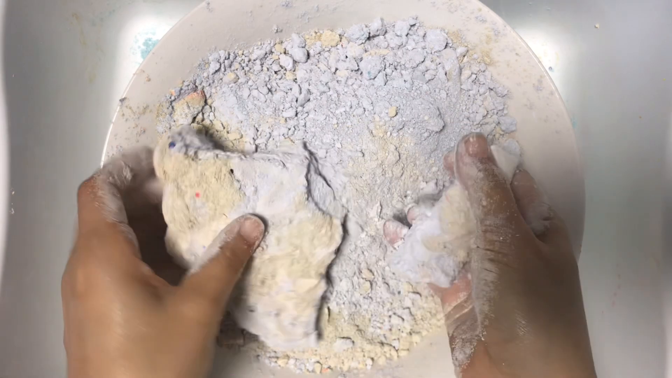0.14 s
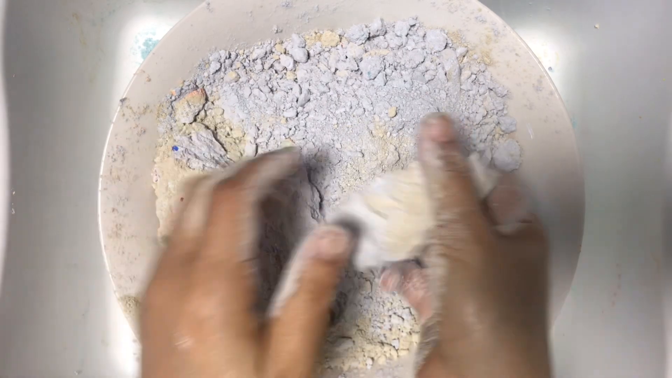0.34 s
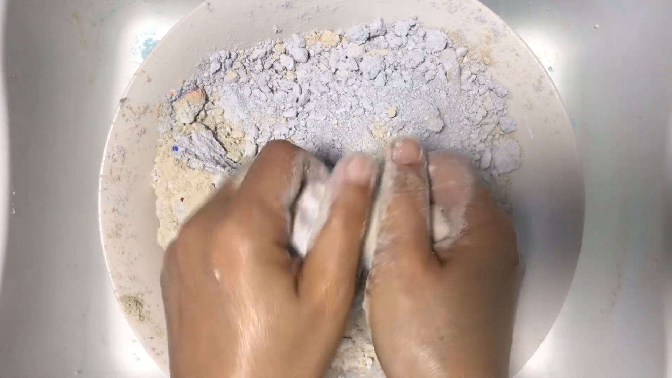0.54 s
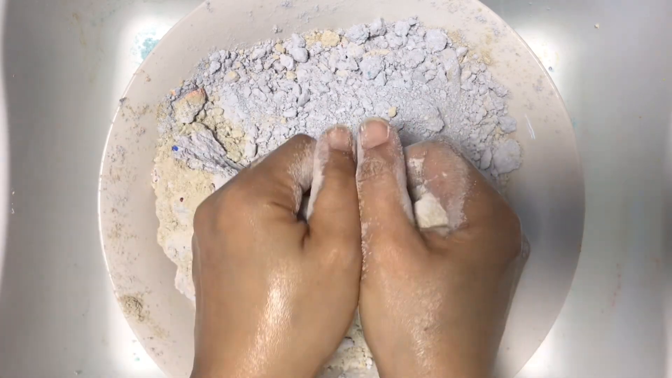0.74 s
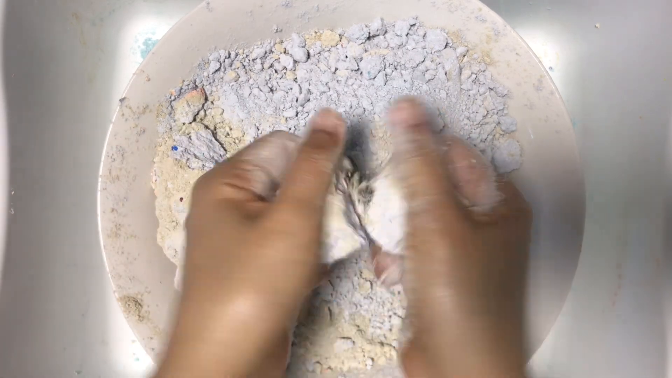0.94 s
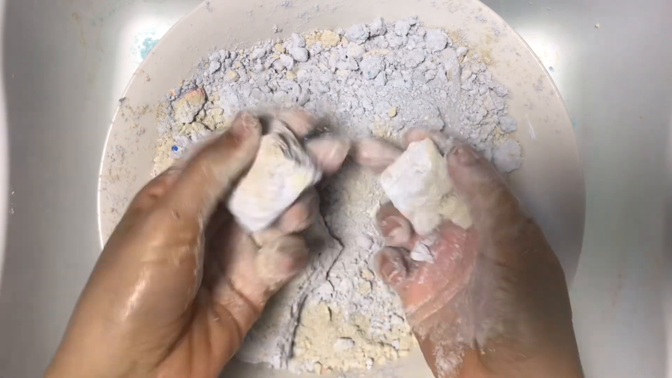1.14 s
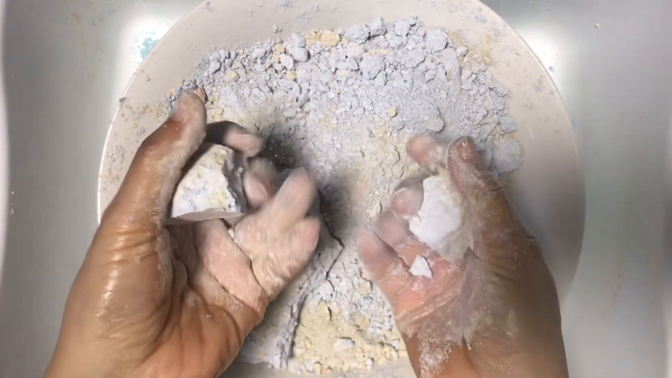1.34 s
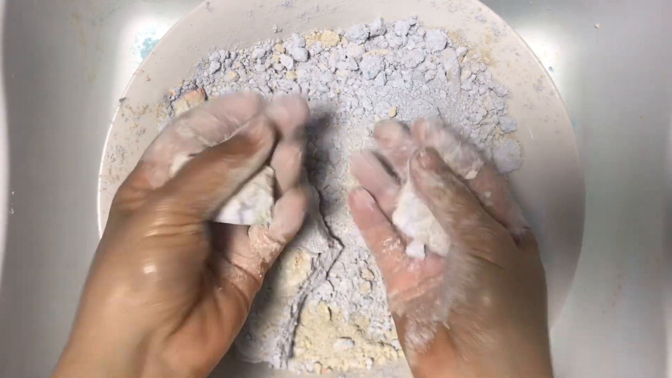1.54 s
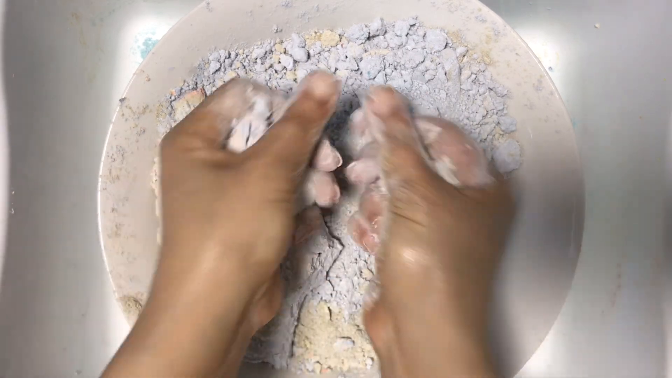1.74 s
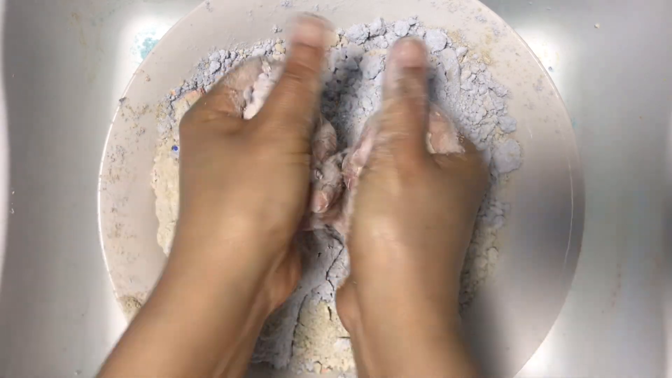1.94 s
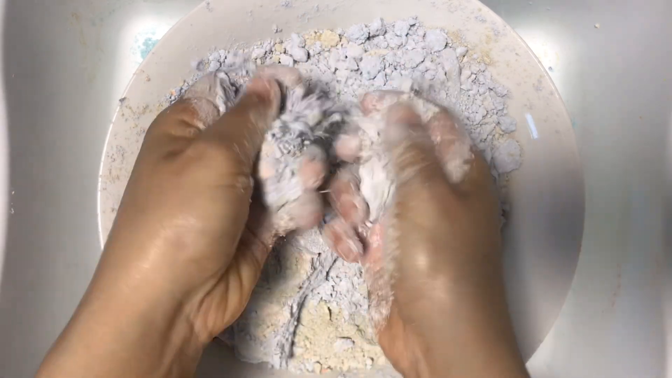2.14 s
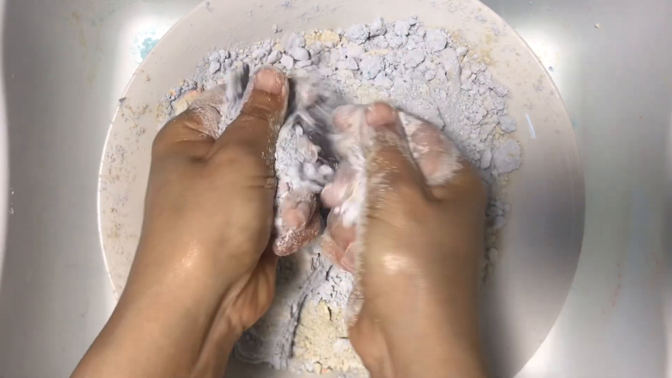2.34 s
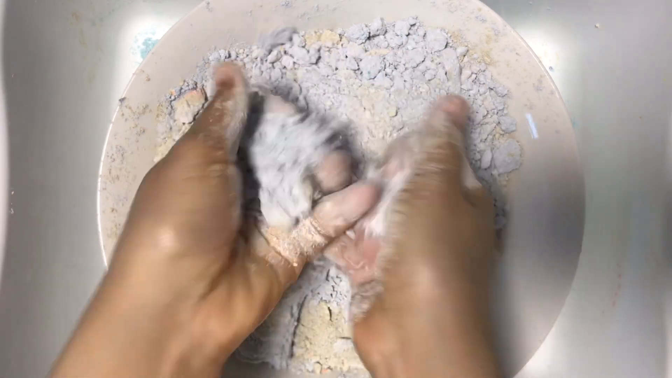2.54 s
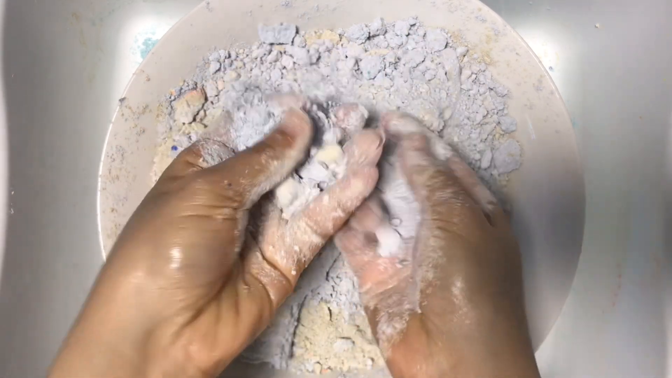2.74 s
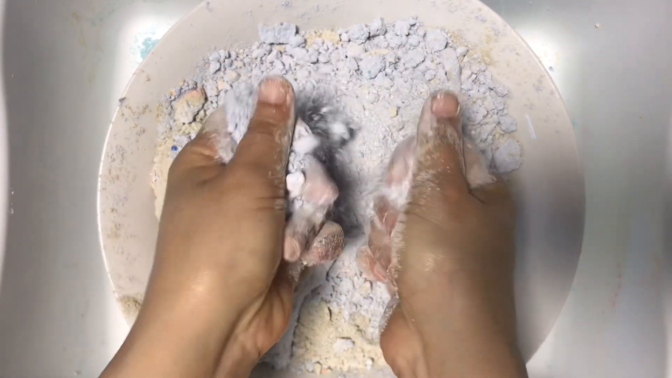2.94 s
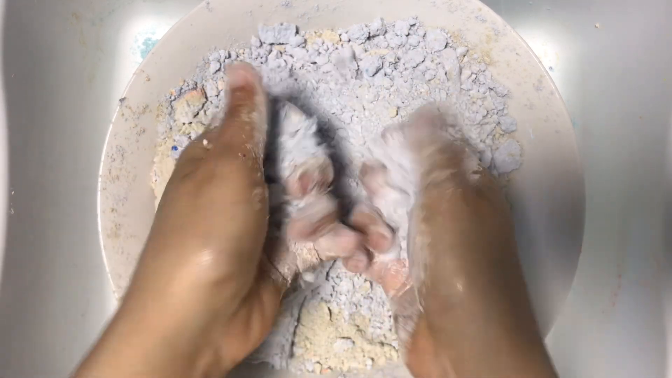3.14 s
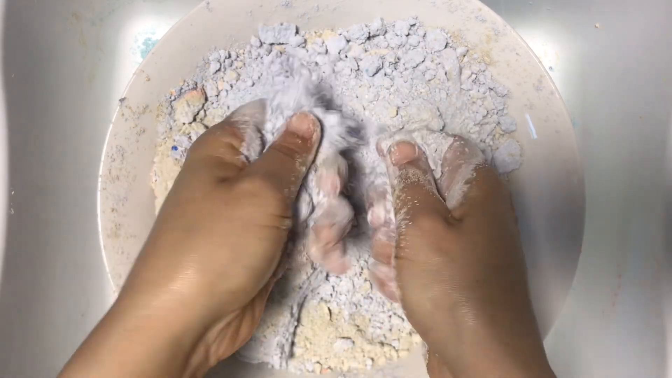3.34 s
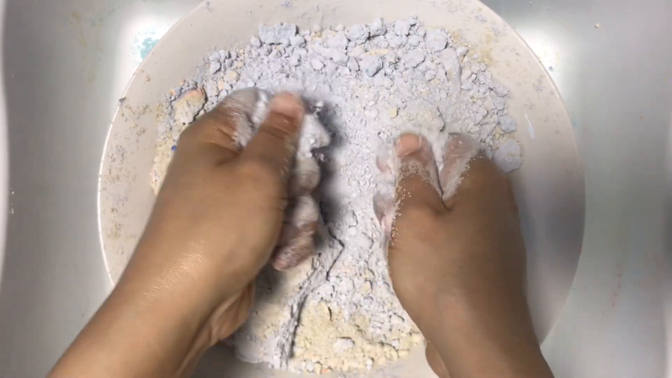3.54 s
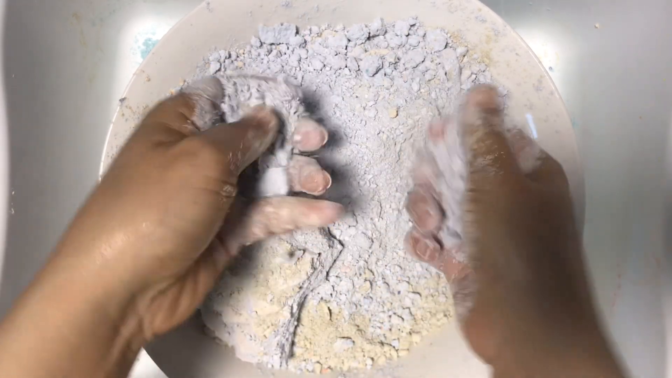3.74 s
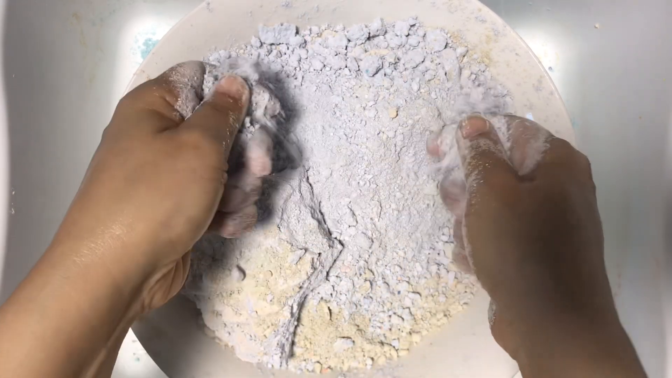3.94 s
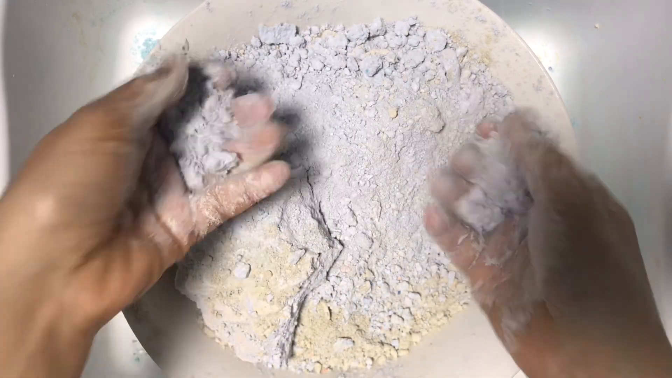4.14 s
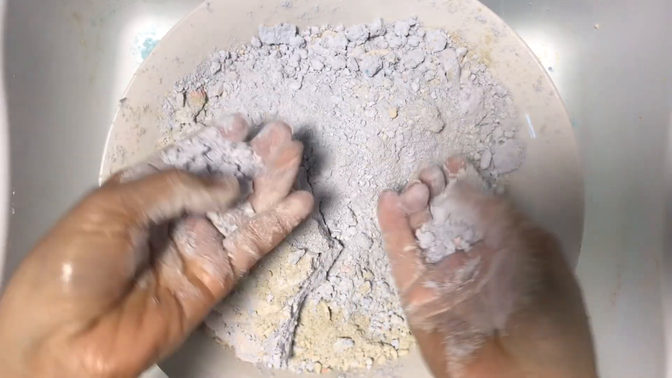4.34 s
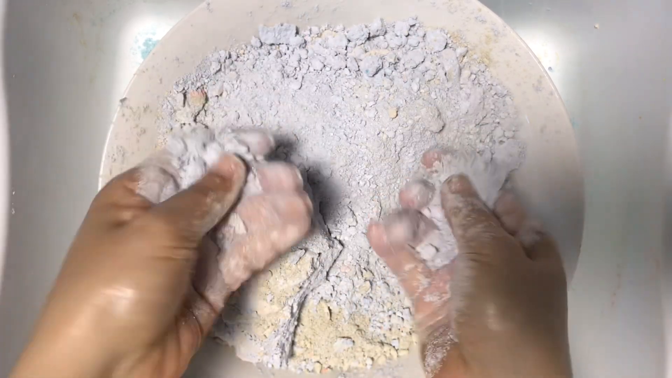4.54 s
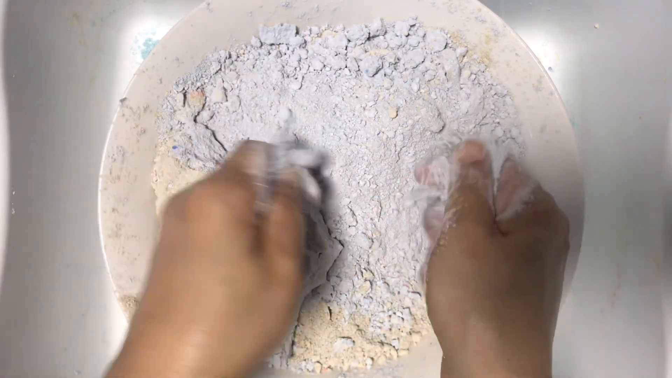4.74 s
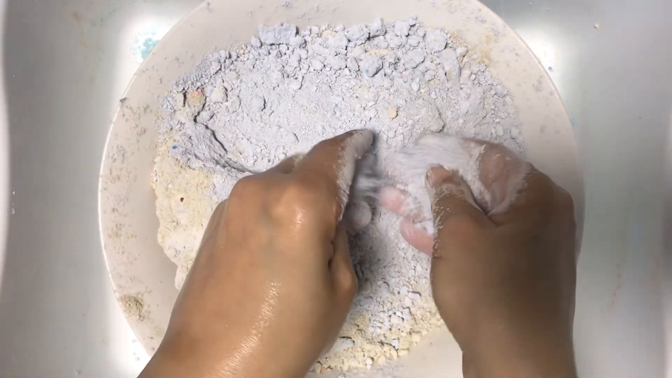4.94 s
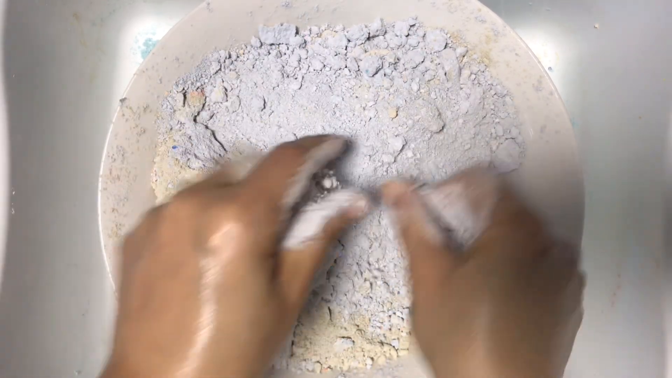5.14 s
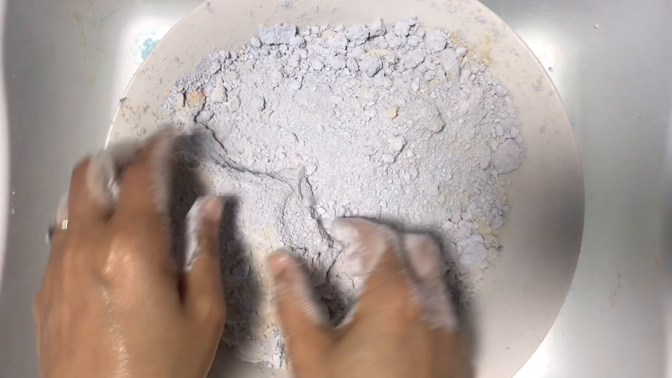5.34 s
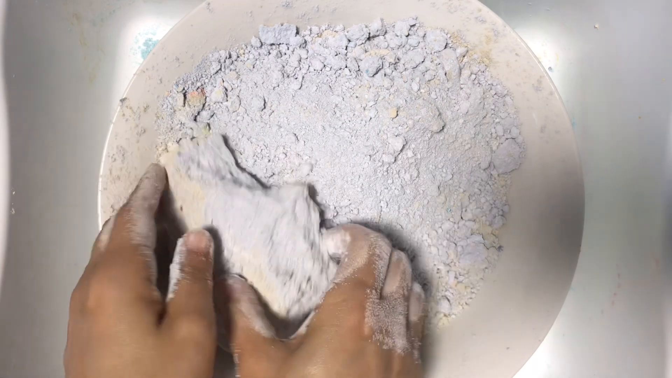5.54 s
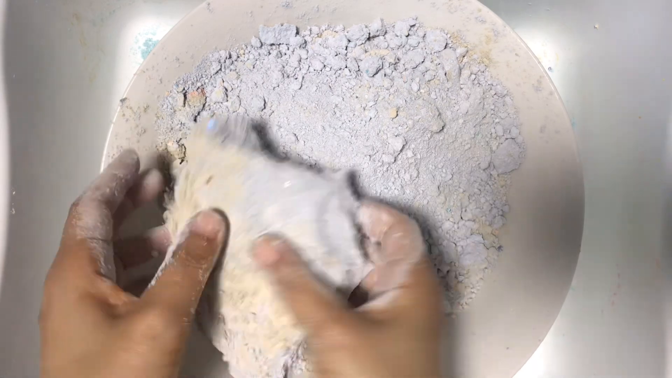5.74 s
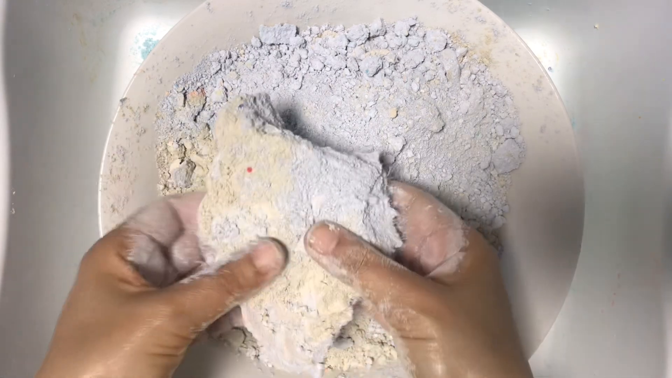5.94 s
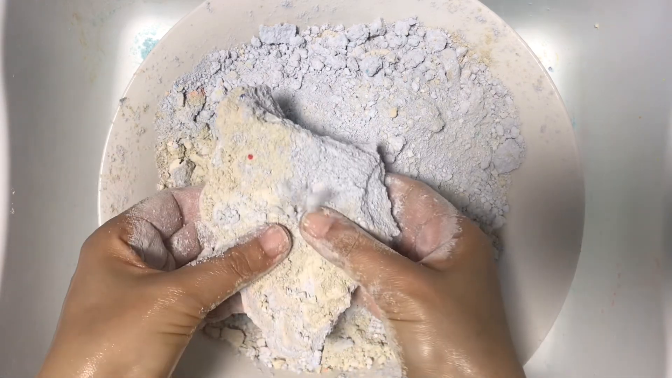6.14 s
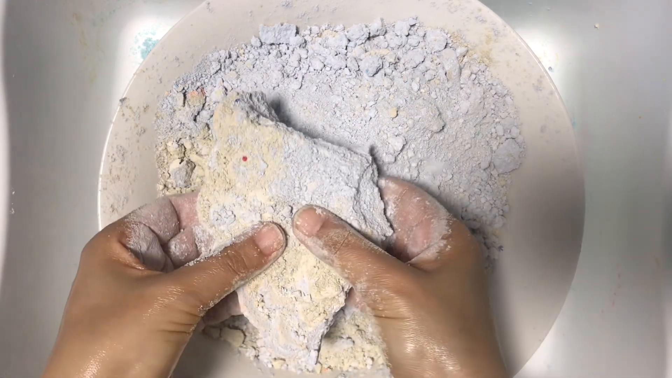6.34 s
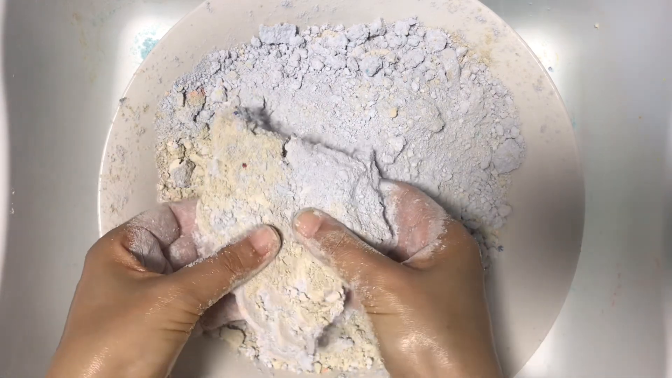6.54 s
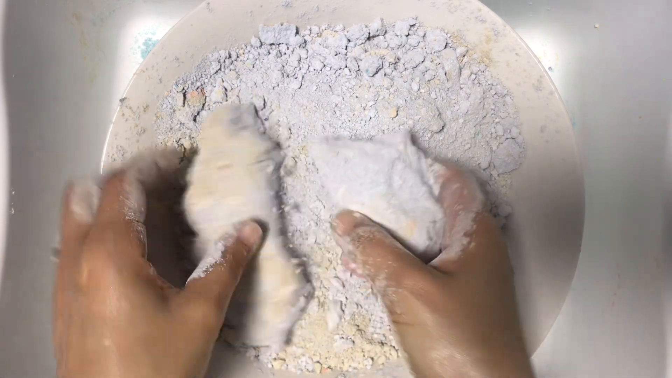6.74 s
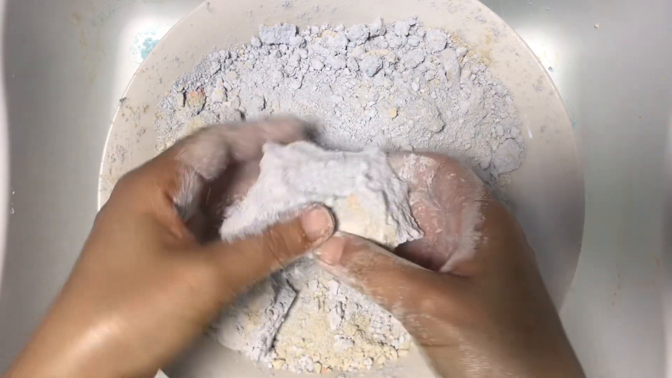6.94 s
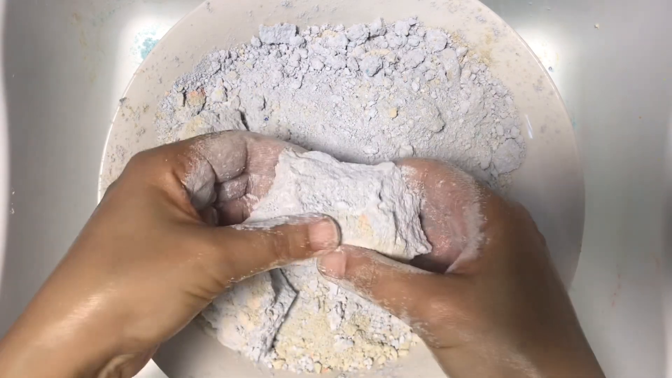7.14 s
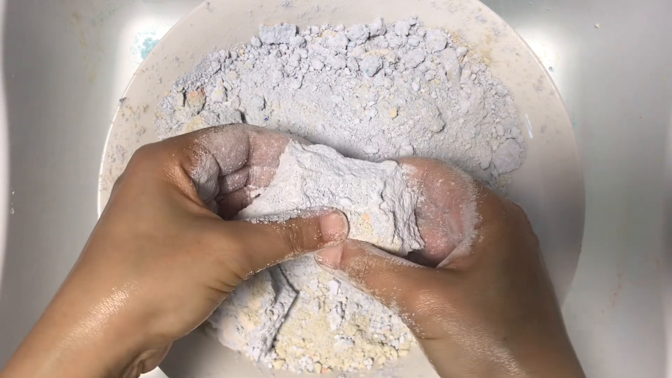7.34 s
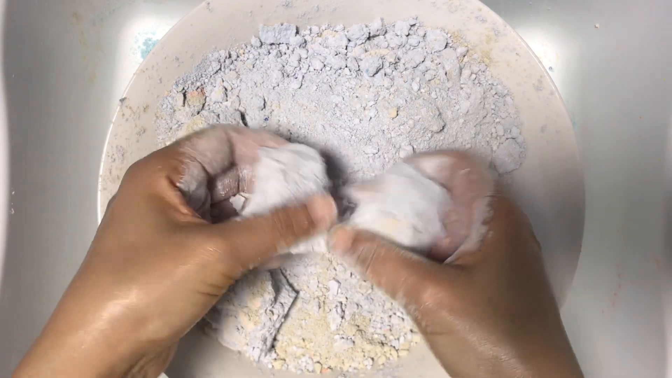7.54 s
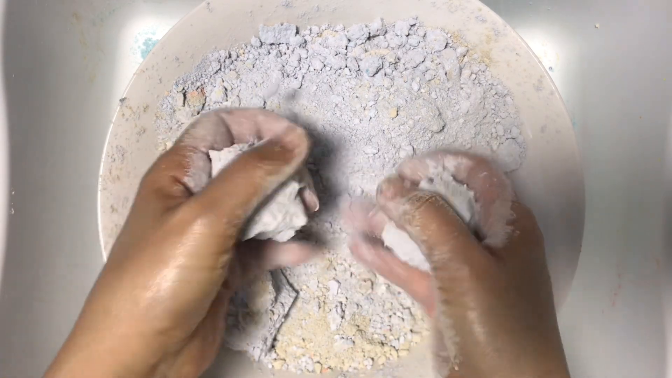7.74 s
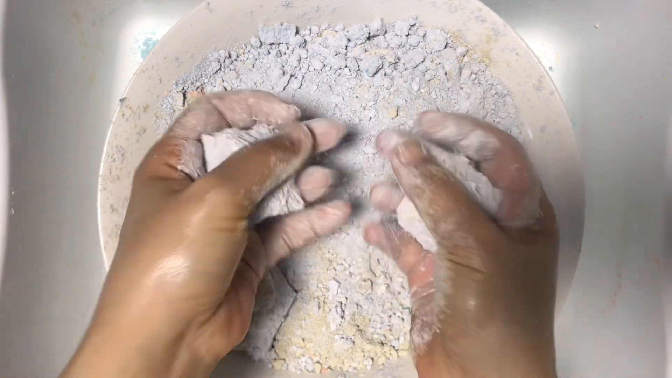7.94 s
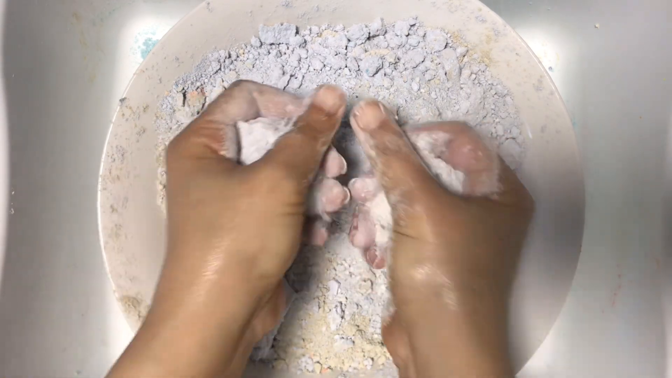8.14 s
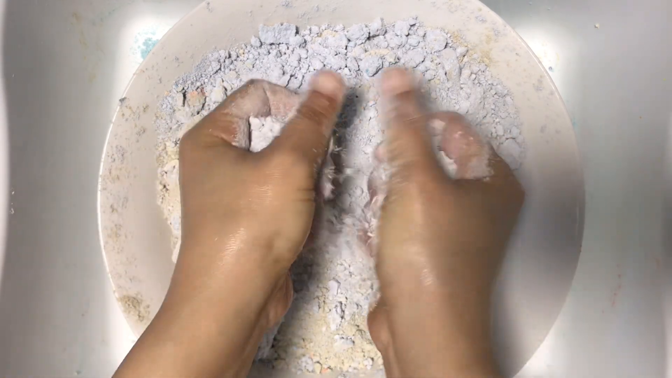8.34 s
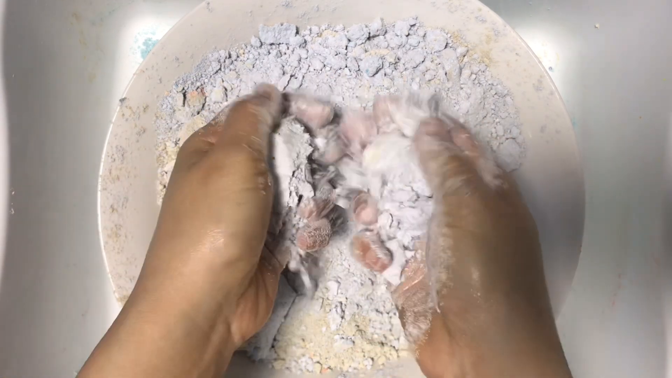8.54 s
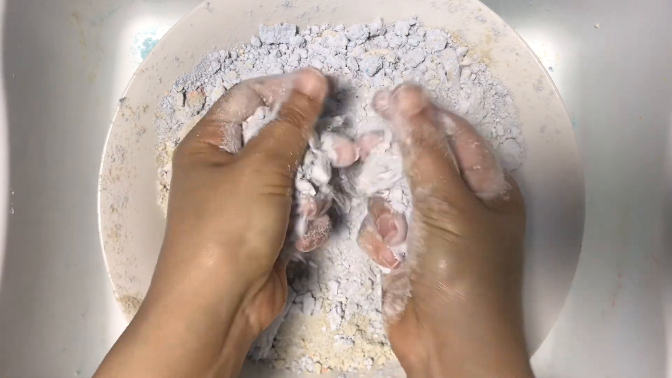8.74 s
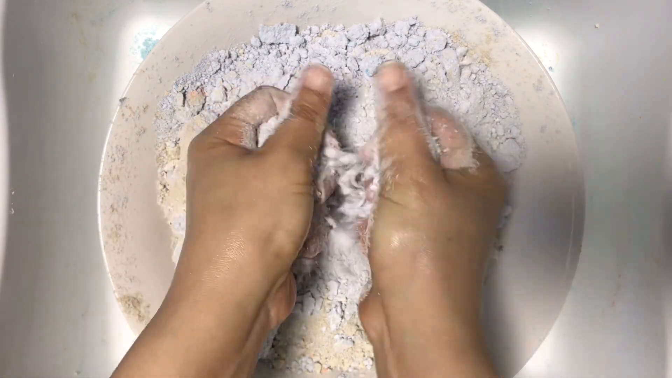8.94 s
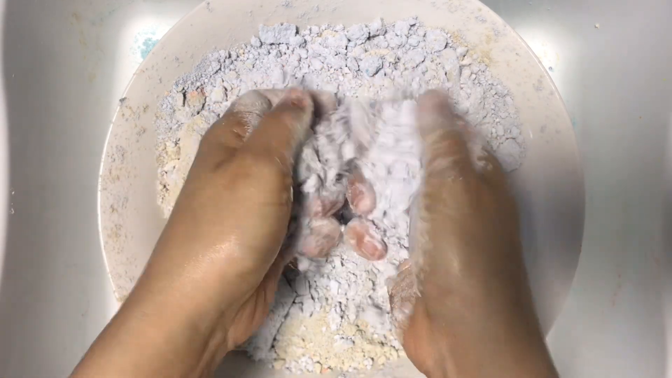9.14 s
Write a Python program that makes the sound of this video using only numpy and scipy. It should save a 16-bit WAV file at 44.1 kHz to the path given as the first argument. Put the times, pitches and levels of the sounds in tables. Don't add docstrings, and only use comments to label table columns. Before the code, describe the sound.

A close, dry perspective in a small quiet room: two hands crumble chalk over a bowl of powder. At 0.2 s a soft crack and dull low thump, then powdery finger strokes and airy hiss. Around 1.4-1.8 s pieces snap in quick succession, with two muffled drops, a brief clear ring and dense crunchy squeezing. From 2 to 4.5 s smaller cracks, crumb pops and rubbing continue over faint bowl rumble, with thin bangle tinkles near 2.4 and 4.2 s. Around 5.2-5.5 s come shuffling, hollow bowl knocks and light metallic chatter. A very heavy, deep thump lands at 5.8 s; sharp breaks with thuds follow at 6.4 and, strongest, 7.3 s. From 8.0 to 8.3 s cracks and thumps cluster, then gritty crackling and skin hiss run to a last crunch at 9.2 s. Low microphone sway follows table nudges.

```python
import sys
import numpy as np
from scipy import signal
from scipy.fft import rfft, irfft
from scipy.io import wavfile

SR = 44100
rng = np.random.default_rng(int(sys.argv[2]) if len(sys.argv) > 2 else 0)


def nominal_scale(level):
    x = np.asarray(level, float) / 20
    return 10 ** x


def output_pcm(signal):
    pcm = np.clip(np.atleast_2d(signal).T, -1, 1) * 32767
    wavfile.write(sys.argv[1], SR, np.round(pcm).astype(np.int16))


N = 409688

# [t/s, peak level/dB, ring of the piece f/Hz, fine splinters peak level/dB]
LUMP_CRACKS = [(0.175, -22.5, 2460, -45), (0.754, -28, 2960, -38), (1.411, -33, 7000, -37),
               (1.5685, -31, 4150, -52), (1.581, -29, 3720, -34), (1.6916, -26, 3000, -50),
               (1.706, -26, 2210, -29), (1.7377, -16, 2400, -50), (1.763, -14.5, 2260, -31),
               (1.773, -23, 970, -46), (1.7866, -32, 1200, -47), (1.828, -20.5, 1140, -35),
               (2.247, -21, 1530, -34), (2.4733, -31, 1500, -40), (2.8905, -23, 1120, -46),
               (2.923, -37, 1020, -55), (3.269, -28, 1230, -60), (4.9507, -30.5, 2270, -49),
               (5.227, -24, 8200, -30.5), (6.392, -18.5, 2330, -27.5), (7.3388, -16, 2250, -23),
               (8.0417, -18.5, 2300, -57), (8.139, -25.5, 4700, -56), (8.195, -21.5, 2200, -53),
               (8.2336, -15, 1120, -44), (8.238, -14.5, 3600, -43), (8.273, -17.5, 2220, -31.5),
               (8.743, -27.5, 3720, -46), (8.7646, -39, 2900, -39.5), (9.181, -27, 3840, -26)]
# [t/s, peak level/dB, ring of the piece f/Hz, fine splinters peak level/dB]
CHIP_SNAPS = [(0.101, -27, 2420, -37), (1.611, -30, 3970, -37), (1.646, -32, 4300, -46),
              (1.672, -53, 2260, -37), (1.9727, -27, 3370, -44), (2.04, -31, 1480, -37),
              (2.367, -26, 1610, -46), (3.008, -44, 5500, -39), (3.19, -29, 4440, -32.5),
              (3.412, -26, 3440, -45), (3.488, -31, 1460, -50), (3.7598, -29, 3130, -54),
              (3.856, -35, 1320, -38), (3.8823, -29, 3010, -36), (4.228, -32, 4640, -43),
              (4.51, -30, 3910, -35), (4.6084, -39, 4610, -42), (4.67, -40, 2250, -42),
              (4.691, -32, 2440, -40), (4.9217, -31, 2340, -60), (5.15, -29, 4020, -37),
              (5.3846, -32, 1430, -54), (7.726, -33, 2640, -41), (7.8164, -43, 2010, -35),
              (8.156, -30, 3400, -45), (8.2925, -31, 4530, -49), (8.3246, -38, 4640, -31),
              (8.527, -38, 1400, -56), (9.1347, -31, 3520, -32)]
# [t/s, peak level/dB, bowl pitch f/Hz, t60/s, contact/ms]
LUMP_THUMPS = [(0.213, -6, 52, 0.056, 3.3), (0.236, -12, 75.4, 0.062, 2), (0.29, -20, 87, 0.1, 4.4),
               (0.755, -16.5, 71.4, 0.06, 0.4), (0.966, -25, 90, 0.15, 5.3), (0.982, -28, 110, 0.15, 6),
               (1.001, -32, 126, 0.53, 3.7), (1.5712, -24, 98, 0.18, 3.3), (1.827, -16, 72.0, 0.044, 0.54),
               (1.9735, -18, 124.0, 0.028, 2.6), (2.2485, -17, 84, 0.1, 3.8),
               (2.046, -20.5, 68.6, 0.079, 1.1), (2.448, -19, 102, 0.029, 1.5),
               (2.357, -20.5, 104, 0.055, 0.8), (2.894, -18, 103.0, 0.032, 0.64),
               (4.972, -30, 132, 0.18, 1.5), (5.412, -21, 84, 0.1, 2.5), (5.473, -33, 89, 0.15, 4.5),
               (5.514, -28, 89.5, 0.24, 4.1), (5.8097, 4, 74.5, 0.036, 3.6), (5.9106, -23, 86.0, 0.12, 2.2),
               (6.092, -24, 73, 0.077, 4.2), (6.3933, -1.5, 94, 0.029, 0.3), (6.767, -14.5, 131, 0.14, 1.6),
               (7.3386, 4, 85, 0.036, 0.23), (7.859, -25.5, 63, 0.21, 3.9), (7.9545, -14, 73.4, 0.049, 4.5),
               (8.0425, -4.5, 72.6, 0.027, 0.52), (8.137, -24, 142, 0.23, 2.1),
               (8.1947, -10.5, 124.0, 0.03, 2.4), (8.239, -6, 154, 0.041, 2.4),
               (8.273, -7.5, 121, 0.035, 2), (8.77, -19, 80, 0.052, 1.3), (8.999, -25, 126, 0.1, 0.77),
               (8.723, -18.5, 104, 0.068, 0.72), (9.1365, -13, 50.0, 0.036, 1.9),
               (9.1826, -16.5, 68.7, 0.15, 0.14)]
# [t/s, peak level/dB, bowl pitch f/Hz, t60/s, contact/ms]
POWDER_DROPS = [
    (1.7045, -5, 115, 0.054, 1.0),
    (1.7612, -4.5, 117, 0.068, 1),
]
# [peak t/s, build-up/s, fade/s, crumbling level/dB, load on the bowl level/dB]
SQUEEZES = [(.19, 0.06, 0.092, -44.5, -29.5), (.5, 0.61, 0.33, -57, -50), (.99, 0.056, 0.14, -71.5, -45),
            (1.744, 0.2, 0.25, -41, -34), (2.1, 0.12, 0.13, -43.5, -43), (2.381, 0.44, 0.16, -43.5, -38),
            (2.905, .015, 0.059, -41.5, -50), (2.919, 0.3, 0.3, -47.5, -40), (3.57, 4.8, 0.13, -51.5, -44),
            (3.879, 0.46, 0.61, -51, -44), (4.69, 0.54, 0.33, -49, -43), (4.95, 0.16, 0.55, -50, -43),
            (5.494, 0.17, 0.21, -55, -34), (5.813, 0.94, 0.48, -55, -55), (6.407, 0.015, 0.046, -41, -26),
            (6.623, 0.13, 0.32, -50, -34), (6.85, 0.44, 0.3, -58.5, -52), (7.4, 0.42, 1.6, -62, -51.5),
            (8.098, 0.22, 0.3, -53, -39.5), (8.25, 0.023, 0.055, -38, -50), (8.255, 0.79, 4, -49.5, -59),
            (8.756, 0.7, 1.5, -58.5, -37), (9.19, 0.051, 0.038, -38, -33.5)]
# [f/Hz, width/Hz, level/dB]
CHALK_RINGS = [(1007, 410, -1), (1500, 400, -6), (2170, 160, -6), (2830, 650, -7.5), (3840, 2500, -5)]
# [f/Hz, level/dB per Hz]
CRUMB_SPECTRUM = [(300, 8.5), (700, 2), (1400, -0.5), (2800, 0), (5400, -5), (8500, -7), (12000, -16),
                  (16000, -11.5)]
# [t/s, peak level/dB, centre of the click f/Hz]
CRUMB_POPS = [(0.257, -41, 8250), (0.3695, -34, 8590), (0.677, -37.5, 3320), (1.511, -51.5, 5500),
              (1.4196, -25, 8850), (1.454, -36, 3690), (1.6366, -29, 4000), (1.712, -24.5, 2200),
              (1.805, -32, 2170), (2.0425, -35, 6600), (2.2293, -31, 3170), (2.251, -21, 6100),
              (7.349, -34, 7500), (2.475, -27, 1050), (2.6716, -33, 7310), (2.854, -41, 5800),
              (2.9068, -43, 3400), (2.9252, -26.5, 1770), (2.9781, -44, 1430), (3.0265, -35, 7460),
              (3.161, -35, 4660), (3.3133, -34, 1450), (3.3453, -43, 3610), (3.3857, -37, 1250),
              (3.407, -34, 6600), (3.8022, -32.5, 3200), (4.3814, -38, 6200), (4.6737, -34, 3440),
              (4.9407, -43, 3940), (4.9726, -32, 1420), (5.1118, -41, 6520), (5.2, -37, 8020),
              (5.318, -38, 7930), (5.6016, -44, 3670), (6.6139, -33, 1260), (6.8873, -32.5, 6600),
              (7.01, -36, 4770), (7.032, -34, 9050), (7.053, -34, 8270), (6.393, -22, 4370),
              (7.3602, -40, 3250), (7.701, -38, 9650), (8.0023, -34, 5060), (8.0088, -29, 7340),
              (7.339, -16, 4600), (8.37, -33, 1570), (8.516, -38, 3900), (8.5451, -32, 1440),
              (8.583, -32, 1680), (8.656, -32.5, 5170), (8.6905, -34, 3310), (8.7222, -38, 3370),
              (8.7736, -31, 3540), (8.8349, -47, 2010), (8.859, -41, 3710), (8.9691, -41, 11030)]
# [t/s, peak level/dB]
SPLINTER_SPITS = [(1.4135, -25), (1.419, -32), (3.1903, -31), (3.4115, -38), (4.2285, -30), (7.3387, -21),
                  (8.0436, -33), (8.2725, -33), (9.181, -31)]
# [peak t/s, build-up/s, fade/s, rubbing level/dB]
SKIN_STROKES = [(.128, 0.085, 0.027, -39.5), (.375, 0.017, .5, -49.5), (0.511, 0.029, 0.061, -34),
                (0.93, 0.017, 0.067, -35), (1.005, 0.037, 0.036, -44), (1.125, 0.019, 0.036, -40),
                (1.163, .03, 0.064, -40), (1.255, 0.13, 0.068, -50), (1.333, 0.15, 0.033, -36.5),
                (1.42, 0.012, 0.037, -33.5), (1.578, 0.076, 0.08, -38.5), (1.948, 0.14, 0.99, -46.5),
                (2.472, 0.41, 0.026, -45.5), (3.588, 0.022, 0.026, -40.5), (3.85, 0.2, 0.91, -51),
                (4.236, 0.24, 0.04, -46), (4.52, 0.11, .1, -53), (5.055, 0.14, 0.13, -49.5),
                (5.264, 0.071, 0.1, -46), (5.595, 0.11, 0.1, -50), (5.79, 0.053, 0.099, -47),
                (5.921, 0.12, 0.035, -44.5), (6.399, 0.0062, 0.0096, -23.5), (6.56, 0.035, 0.067, -43),
                (6.607, 0.022, .02, -39), (6.647, .05, 0.051, -43.5), (6.79, .03, .03, -46.5),
                (6.89, 0.13, 0.045, -49), (6.97, 0.09, 0.073, -49), (7.05, 0.025, 0.022, -40.5),
                (7.465, 0.04, 0.12, -45), (7.7, 0.021, .015, -36), (7.745, .02, .03, -49),
                (7.9, 0.073, .1, -53), (7.612, 0.033, 0.055, -38), (7.822, 0.009, 0.019, -33),
                (7.84, 0.024, 0.0082, -35), (8.01, 0.17, 0.044, -42.5), (8.421, 0.033, 0.089, -41.5),
                (8.656, 0.049, 0.024, -37.5), (9.016, 0.025, 0.025, -43), (8.62, 0.027, .04, -47),
                (9.1, 0.017, 0.043, -35.5), (9.14, .03, 0.046, -41), (9.2, 0.029, 0.024, -37)]
# [f/Hz, level/dB per Hz]
SKIN_SPECTRUM = [(1500, -28), (2500, -8), (3900, -5.5), (5400, -3), (6500, -0.5), (9300, 1.5), (11800, -9),
                 (14400, -0.5)]
# [peak t/s, build-up/s, fade/s, scraping level/dB]
LUMP_SCRAPES = [(.125, 0.11, .035, -43), (.515, 0.026, 0.087, -49.5), (1.58, 0.035, 0.054, -47),
                (5.59, 0.086, 0.077, -52), (6.61, 0.02, 0.022, -51), (7.04, 0.1, 0.12, -55.5),
                (8.43, .06, .08, -46), (8.775, .03, 0.028, -44), (8.86, .02, 0.036, -51),
                (9.01, 0.023, 0.031, -50), (9.2, 0.079, .06, -45)]
# [t/s, peak level/dB]
CORE_PINGS = [(1.7385, -19), (8.043, -36), (8.061, -39), (8.123, -31), (8.156, -29), (8.273, -37)]
# [t/s, peak level/dB, f/Hz]
BOWL_KNOCKS = [(0.179, -43, 327), (0.186, -30, 470), (0.196, -27, 386), (0.211, -30, 450),
               (0.753, -35, 310), (1.704, -34, 331), (1.732, -27, 570), (1.7815, -29, 940),
               (1.78, -39, 386), (1.826, -25.5, 554), (1.971, -30, 526), (2.367, -29.5, 620),
               (2.473, -30.5, 670), (2.889, -41, 331), (2.92, -28, 548), (5.378, -25.5, 545),
               (5.399, -19.5, 575), (6.3932, -17.5, 430), (6.611, -20.5, 268), (6.76, -47, 234),
               (6.731, -37, 610), (6.746, -31, 613), (6.757, -27, 583), (6.772, -40, 373),
               (6.797, -42, 600), (7.339, -20.5, 514), (7.352, -24, 937), (7.362, -28, 526),
               (7.3395, -23, 984), (7.381, -28.5, 550), (8.042, -24.5, 354), (8.193, -26, 533),
               (8.235, -18.5, 327), (8.271, -26, 570), (8.688, -27, 382), (0.061, -34.5, 346),
               (0.008, -32, 296)]
# [t/s, level/dB, favoured pitch/octaves above lowest mode, fall away from it/dB per octave]
BANGLE_KNOCKS = [(0.409, -57, 1.4, -1), (.449, -55, 1.4, 10), (0.516, -52, 1.45, 31),
                 (0.544, -59, 1.45, 31), (.61, -57, 1.45, 27), (1.513, -47, 1.45, 9.5),
                 (2.369, -41.5, .01, 8), (2.378, -46, .83, 23), (2.475, -37.5, 0.45, 23),
                 (3.91, -47.5, 0.97, 8), (4.079, -52, 2, 15), (4.169, -51, 3, 2.5), (4.134, -55, 2, 11),
                 (4.153, -54, 1.9, 0), (4.193, -51.5, 1.7, 7), (4.23, -44.5, 3.1, 5),
                 (4.609, -49, 1.65, 13), (5.215, -55, 1.1, 18), (5.246, -54, 2.3, 10),
                 (5.254, -54, .83, 22), (5.255, -48, 2.3, 21), (5.27, -49, 1.3, 18), (5.29, -48.5, 1.5, 10),
                 (5.291, -54, 2.8, 14), (5.342, -58, .83, 25), (5.345, -57, 2.3, 12),
                 (5.357, -52.5, 1.8, 10), (5.386, -45.5, 0.25, 10), (5.386, -61, 1.45, 20),
                 (5.405, -56.5, 2.4, 2), (5.705, -57, 1.9, 5), (5.731, -46, 2.64, 22),
                 (5.777, -46.5, 1.3, 11), (5.97, -55.5, 1.3, 7), (6.759, -59, 1.7, 2),
                 (6.785, -53, 1.1, 13), (8.323, -39, 1.6, 18), (8.327, -45, 2.4, 20)]
# [f/Hz, t60/s, level/dB]
BANGLE_MODES = [(1500, 0.068, 5), (2650, 0.12, -3), (4110, 0.083, 2), (5620, 0.14, -0.5), (7260, 0.074, -4),
                (8630, 0.076, 0.5), (10350, 0.074, 1.5), (13925, .14, -10)]
# [f/Hz, level/dB per Hz]
BOWL_SPECTRUM = [(30, -13), (50, -3.5), (115, 0), (150, -7.5), (300, -16.5), (620, -24), (800, -53),
                 (1500, -85.5)]
# [widest swing t/s, build-up/s, swing level/dB, rocking f/Hz]
TABLE_NUDGES = [(0.297, 0.09, -12.5, 22.34), (0.39, 0.33, -23, 22), (1.061, 0.034, -29, 22),
                (1.793, 0.22, -27.5, 21), (5.481, 0.062, -14, 24.3), (5.562, 0.088, -17, 22),
                (6.442, 0.065, -39, 24), (6.717, 0.11, -9.5, 22.75), (6.858, 0.11, -11, 21.6),
                (7.029, 0.079, -27.5, 23.5), (7.118, 0.096, -29, 21.3), (7.646, 0.12, -27.5, 24.5),
                (9.105, .1, -38, 22)]
# [f/Hz, level/dB per Hz]
ROOM_SPECTRUM = [(12, -9), (25, -4.5), (55, -10.5), (120, -23), (300, -26), (600, -28), (900, -33.5),
                 (2600, -42)]

REST_CRUMB_DB, REST_LOAD_DB, REST_SWING_DB = -64, -53.5, -55
SLIDE_UNDER_CRUMBS_DB = -6
SWELL_DB = 15
POWDER_HZ = 640
SPIT_HZ = 14500
CORE_HZ, CORE_T60_S = 2200, 0.025
STAND_HZ, SETTLE_S = 22, 0.16
ROOM_DB = -45
TOP_HZ = 15700


def level(x):
    return x / np.sqrt(np.mean(x ** 2))


def add_at(out, s, sound):
    start = int(s * SR)
    out[start:start + len(sound)] += sound


def colour(x, shape):
    hz, db = np.transpose(shape)
    grid = np.maximum(np.arange(4097) * SR / 8192, 1)
    cepstrum = irfft(np.log(nominal_scale(np.interp(np.log(grid), np.log(hz), db))))
    cepstrum[1:4096] *= 2
    cepstrum[4097:] = 0
    response = irfft(np.exp(rfft(cepstrum)))
    return signal.fftconvolve(x, response)[:N]


def band(x, hz, width):
    return signal.lfilter(*signal.iirpeak(hz, hz / width, fs=SR), x)


def walk(rate):
    held = rng.standard_normal(4000)
    return np.interp(np.arange(N) * rate / SR, np.arange(len(held)), held)


def grains(rate, spread_db, burst_ms):
    draw, size, noise = rng.random(N), rng.exponential(size=N), rng.standard_normal(N)
    kicks = (draw < rate / SR) * nominal_scale(spread_db * np.minimum(size, 5))
    fade = np.exp(-1000 / (burst_ms * SR))
    return noise * signal.lfilter([1], [1, -fade], kicks)


def swells(peak_s, rise_s, fade_s, db, rest_db):
    t, power = np.arange(0, N, 64) / SR, 0
    for s, rise, fade, peak_db in np.broadcast(peak_s, rise_s, fade_s, db):
        away = np.where(t < s, (s - t) / rise, (t - s) / fade)
        power = power + nominal_scale(peak_db - SWELL_DB * away) ** 2
    return 10 * np.log10(np.interp(np.arange(N) / SR, t, power) + nominal_scale(rest_db) ** 2)


def cracks():
    out, t = np.zeros(N + SR), np.arange(SR // 12) / SR
    coarse = signal.butter(2, [1100, 6000], "band", fs=SR, output="sos")
    fine = signal.butter(2, [4200, 11500], "band", fs=SR, output="sos")
    for table, run_s, debris_db in ((LUMP_CRACKS, 0.0014, -22), (CHIP_SNAPS, 0.0009, -26)):
        snap = (1 - np.exp(-t / 0.0004)) * np.exp(-t / run_s)
        for s, db, hz, fine_db in table:
            noise, steps = rng.standard_normal((2, len(t)))
            jerks = nominal_scale(3.0 * np.repeat(steps, 24)[:len(t)])
            click = 6 * (np.arange(len(t)) == 14)
            burst = (noise * jerks + click) * snap
            debris = noise * jerks ** 1.5 * nominal_scale(debris_db)
            ring = signal.lfilter(*signal.iirpeak(hz, 6.0, fs=SR), burst)
            piece = signal.sosfilt(coarse, 0.32 * burst + 2 * debris * np.exp(-t / 0.02)) + 3.2 * ring
            splinters = signal.sosfilt(fine, burst + debris * np.exp(-t / 0.012))
            piece = nominal_scale(db) * piece / abs(piece).max()
            splinters = nominal_scale(fine_db + 10.0) * splinters / abs(splinters).max()
            add_at(out, s, piece + splinters)
    return out[:N]


def thumps():
    out, t = np.zeros(N + SR), np.arange(SR // 4) / SR
    slowing_s = 0.728 * t + 0.0052 * (1 - np.exp(-t / 0.0043))
    for table, swing_s in ((LUMP_THUMPS, slowing_s), (POWDER_DROPS, t)):
        for s, db, hz, t60, contact_ms in table:
            push = 1 - np.exp(-(1000 * t / contact_ms) ** 2)
            swing = 1000. ** (-t / t60) * np.cos(2 * np.pi * hz * swing_s)
            add_at(out, s, nominal_scale(db) * push * swing)
    return signal.sosfilt(signal.butter(4, POWDER_HZ, fs=SR, output="sos"), out[:N])


def crumbling(db):
    cluster = nominal_scale(2.8 * walk(40))
    bits = level(grains(500 * cluster, 3.6, 0.5)) + 0.65 * rng.standard_normal(N)
    body = 0
    for hz, width, ring_db in CHALK_RINGS:
        body = body + nominal_scale(ring_db) * level(band(grains(220 * cluster, 2.6, 0.9), hz, width))
    return nominal_scale(db + 3.0) * level(level(colour(bits, CRUMB_SPECTRUM)) + 0.7 * level(body))


def ticks():
    out, t = np.zeros(N + SR), np.arange(SR // 100) / SR
    snap = (1 - np.exp(-t / 0.0004)) * np.exp(-t / 0.0008)
    pops = CRUMB_POPS + [(s, db, SPIT_HZ) for s, db in SPLINTER_SPITS]
    for s, db, hz in pops:
        noise = rng.standard_normal(len(t))
        click = signal.lfilter(*signal.iirpeak(hz, 1 + hz / 8000, fs=SR), noise * snap)
        add_at(out, s, nominal_scale(db + 2.0) * click / abs(click).max())
    return out[:N]


def rubbing(db):
    slips = nominal_scale(3.0 * walk(45))
    hiss = level(rng.standard_normal(N) * slips) + 0.5 * level(grains(900, 3.5, 0.7))
    patches = 0
    for hz in (4200, 6700, 8900, 10500, 14000):
        patches = patches + nominal_scale(5.6 * walk(14)) * band(hiss, hz, 0.35 * hz)
    return nominal_scale(db) * level(colour(patches, SKIN_SPECTRUM))


def scraping(db):
    grit = level(grains(4000, 2.0, 0.6))
    low_ring = nominal_scale(2.9 * walk(23)) * band(grit, 2550, 810)
    high_ring = nominal_scale(1.8 * walk(33) - 1.5) * band(grit, 3600, 1100)
    return nominal_scale(db) * level(low_ring + high_ring)


def pings():
    out, t = np.zeros(N + SR), np.arange(SR // 16) / SR
    ring = (1 - np.exp(-t / 0.00089)) * 1000. ** (-t / CORE_T60_S) * np.sin(2 * np.pi * CORE_HZ * t)
    for s, db in CORE_PINGS:
        add_at(out, s, nominal_scale(db) * ring)
    return out[:N]


def clunks():
    out, t = np.zeros(N + SR), np.arange(SR // 8) / SR
    envelope = (1 - np.exp(-t / 0.002)) * 1000. ** (-t / 0.046)
    wall = 0.51 * np.sin(2 * np.pi * 470 * t) + 0.28 * np.sin(2 * np.pi * 640 * t)
    for s, db, hz in BOWL_KNOCKS:
        add_at(out, s, nominal_scale(db) * envelope * (np.sin(2 * np.pi * hz * t) + wall))
    return out[:N]


def bangle():
    out, t = np.zeros(N + SR), np.arange(SR // 4) / SR
    hz, t60, mode_db = np.transpose(BANGLE_MODES)[:, :, None]
    pair = np.sin(2 * np.pi * hz * t) + 0.2 * np.sin(2 * np.pi * 1.006 * hz * t)
    rings = 1000. ** (-t / t60) * pair
    octaves = np.log2(hz / hz[0])
    for s, knock_db, favoured, fall_db in BANGLE_KNOCKS:
        db = knock_db + mode_db - fall_db * abs(octaves - favoured) + rng.standard_normal(hz.shape)
        add_at(out, s, np.sum(nominal_scale(db + 7.5) * rings, axis=0))
    return out[:N] * nominal_scale(1.5 * walk(70))


def bowl(db):
    pushes = level(grains(200, 2.5, 3.0)) + rng.standard_normal(N)
    return nominal_scale(db + 2.5) * level(colour(pushes, BOWL_SPECTRUM))


def stand():
    cycles = np.cumsum(STAND_HZ * (1 + 0.051 * walk(16.0))) / SR
    sway = nominal_scale(REST_SWING_DB) * np.sqrt(2) * np.sin(2 * np.pi * cycles)
    out, t = np.zeros(N + 2 * SR), np.arange(-SR // 2, SR // 2) / SR
    for s, rise_s, db, hz in TABLE_NUDGES:
        envelope = nominal_scale(db - SWELL_DB * np.where(t < 0, (t / rise_s) ** 2, t / SETTLE_S))
        swing = sum(share * np.cos(2 * np.pi * k * hz * t) for k, share in ((1, 1), (2, 0.15), (3, 0.1)))
        add_at(out, s, envelope * swing)
    return out[SR // 2:SR // 2 + N] + sway


def room():
    return nominal_scale(ROOM_DB) * level(colour(rng.standard_normal(N), ROOM_SPECTRUM))


def scene():
    *timing, crumb_db, load_db = np.transpose(SQUEEZES)
    crumb_db = swells(*timing, crumb_db, REST_CRUMB_DB)
    load_db = swells(*timing, load_db, REST_LOAD_DB)
    rub_db = swells(*np.transpose(SKIN_STROKES), crumb_db + SLIDE_UNDER_CRUMBS_DB)
    scrape_db = swells(*np.transpose(LUMP_SCRAPES), -90)
    near = cracks() + crumbling(crumb_db) + ticks() + rubbing(rub_db)
    near = near + scraping(scrape_db) + pings() + clunks() + bangle()
    t = np.arange(SR // 5) / SR
    tail = rng.standard_normal(len(t)) * 1000. ** (-t / 0.15)
    tail = tail / np.sqrt(np.sum(tail ** 2))
    wet = nominal_scale(-17) * signal.fftconvolve(near, tail)[:N]
    return (near + wet + thumps() + bowl(load_db) + stand() + room())[None]


def band_limit(x):
    return signal.sosfilt(signal.butter(12, 16330, fs=SR, output="sos"), x)


def record(dry):
    cut = signal.sosfilt(signal.ellip(10, 0.3, 60, TOP_HZ, fs=SR, output="sos"), dry)
    return band_limit(np.clip(cut, -1, 1))


dry = scene()
out = record(dry)
output_pcm(out)
```